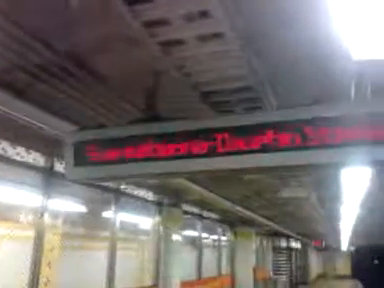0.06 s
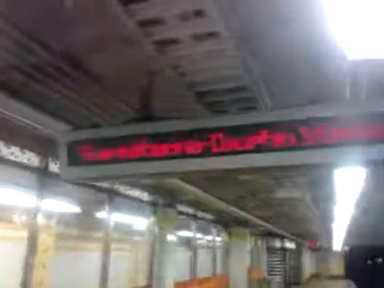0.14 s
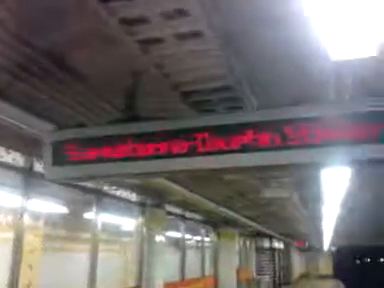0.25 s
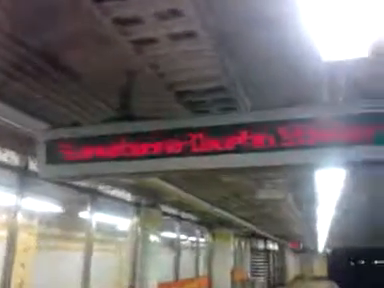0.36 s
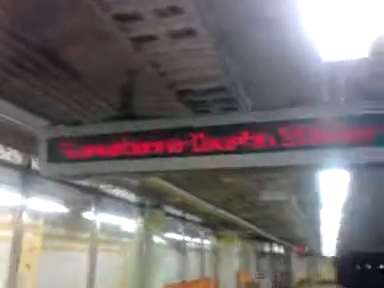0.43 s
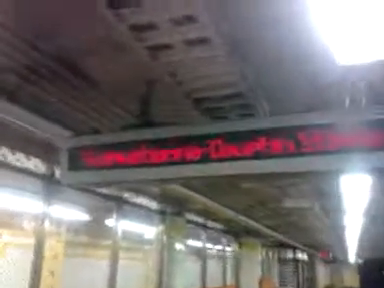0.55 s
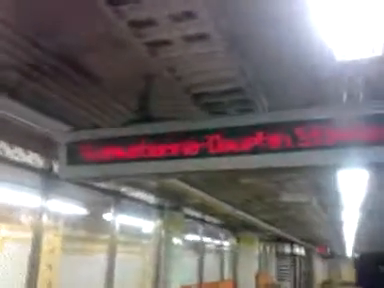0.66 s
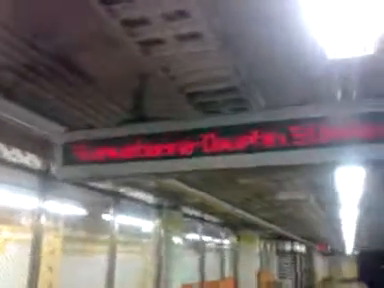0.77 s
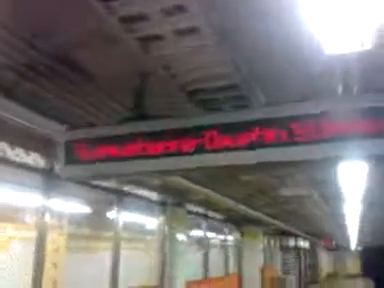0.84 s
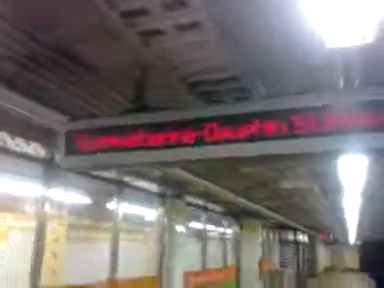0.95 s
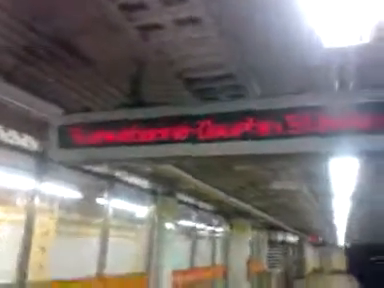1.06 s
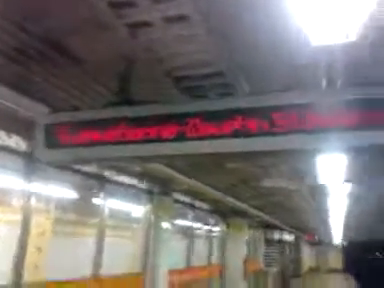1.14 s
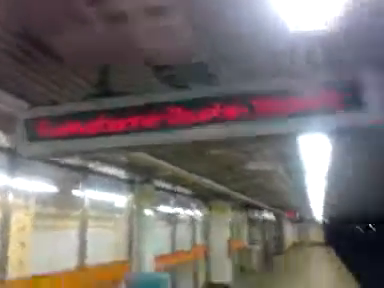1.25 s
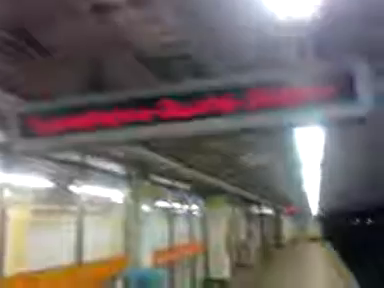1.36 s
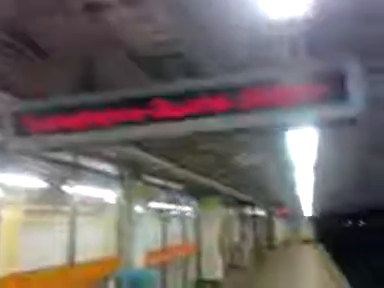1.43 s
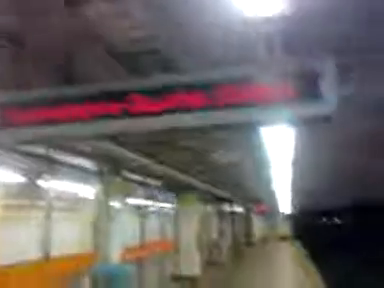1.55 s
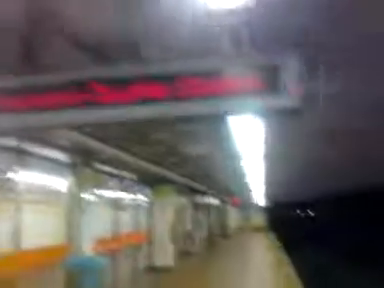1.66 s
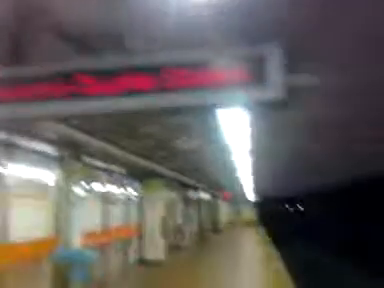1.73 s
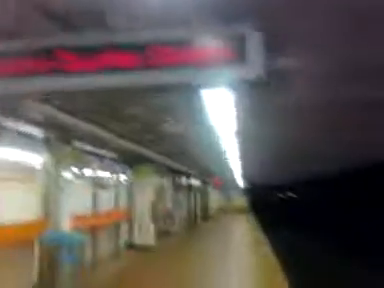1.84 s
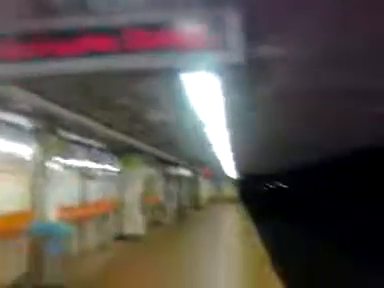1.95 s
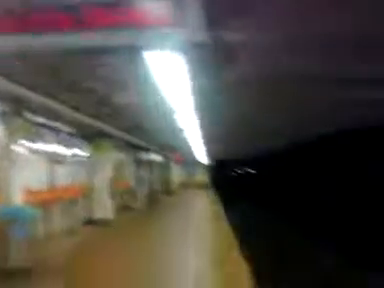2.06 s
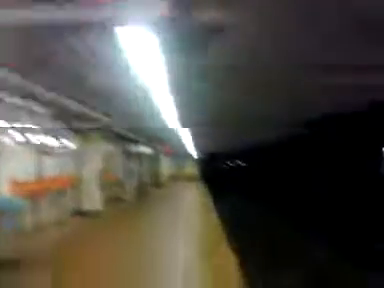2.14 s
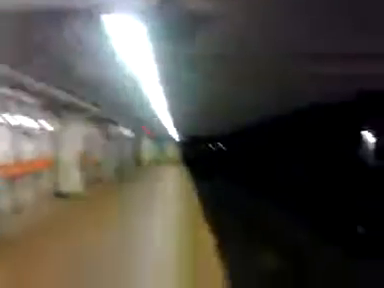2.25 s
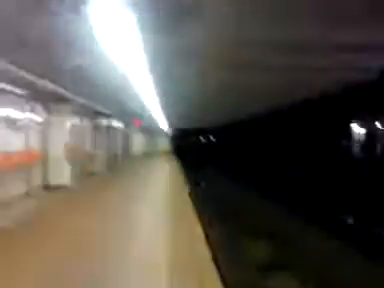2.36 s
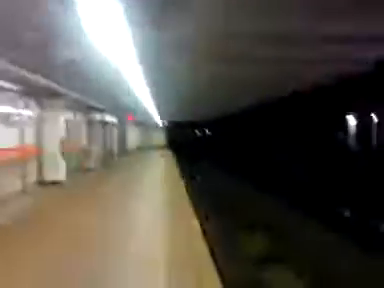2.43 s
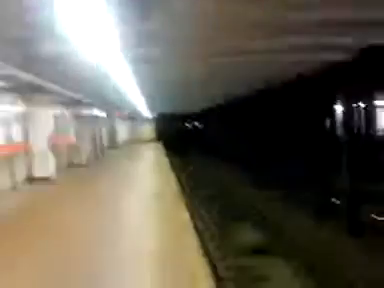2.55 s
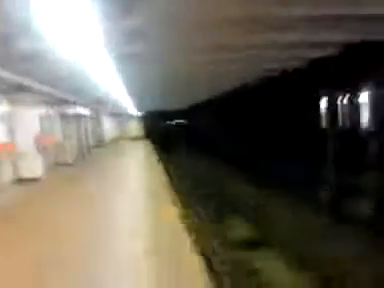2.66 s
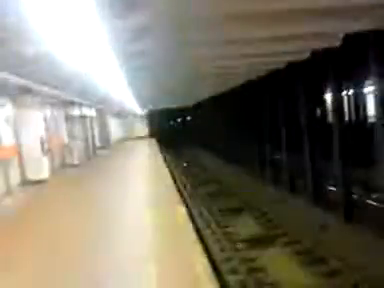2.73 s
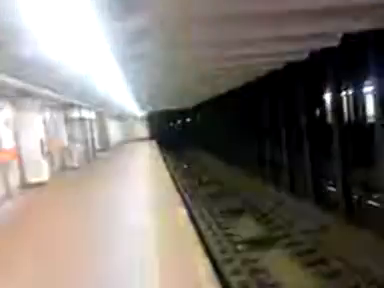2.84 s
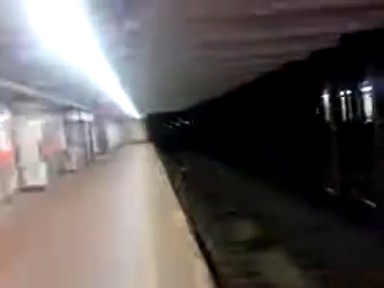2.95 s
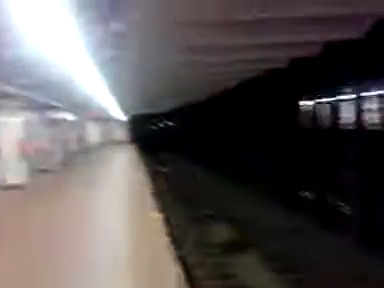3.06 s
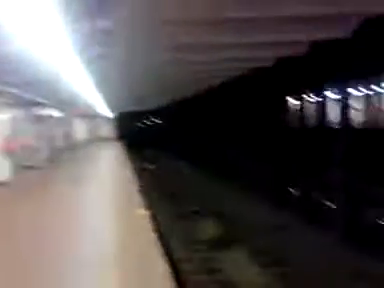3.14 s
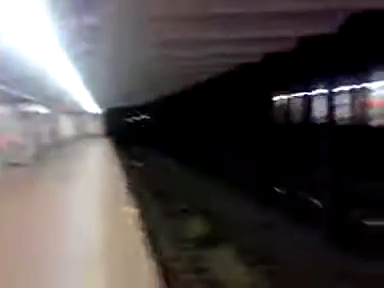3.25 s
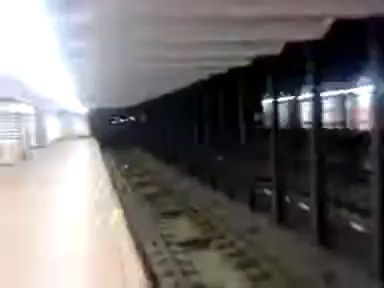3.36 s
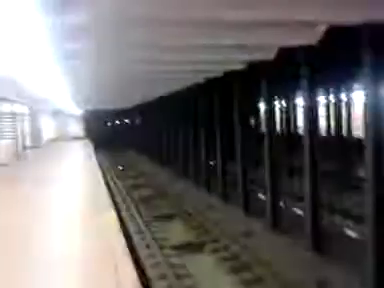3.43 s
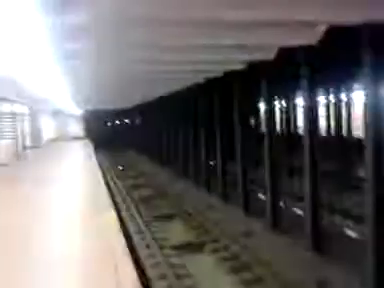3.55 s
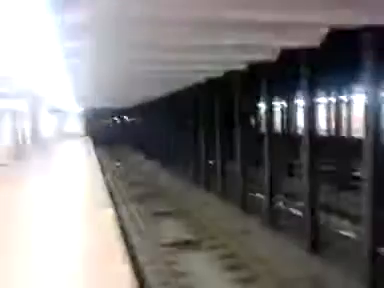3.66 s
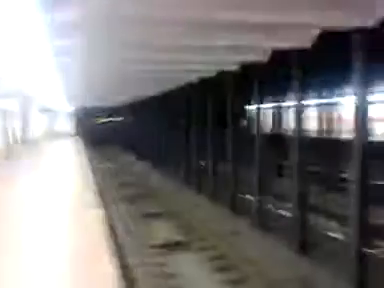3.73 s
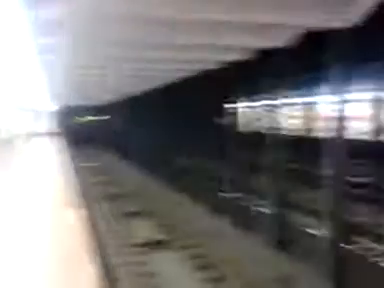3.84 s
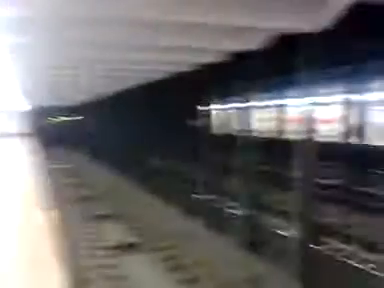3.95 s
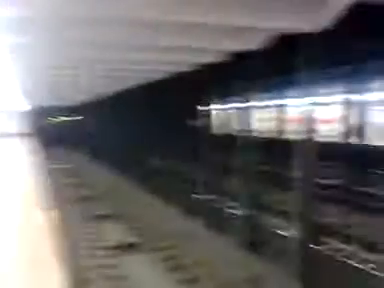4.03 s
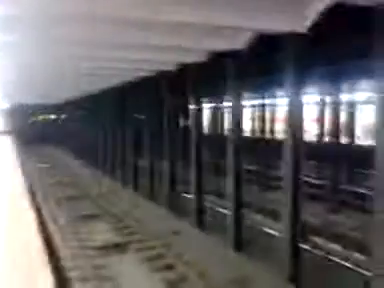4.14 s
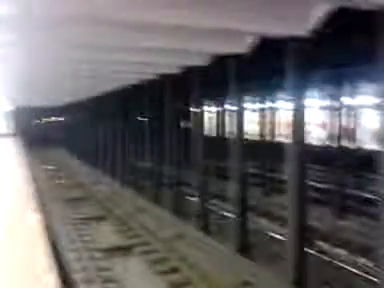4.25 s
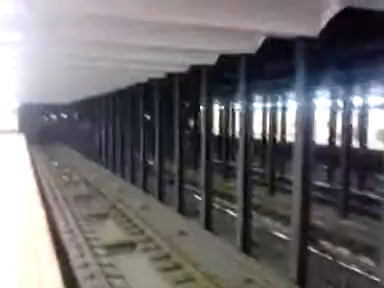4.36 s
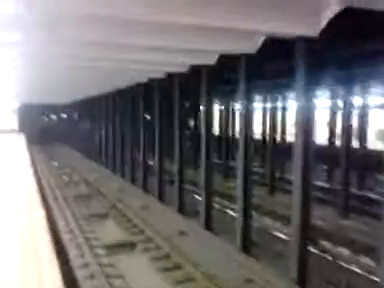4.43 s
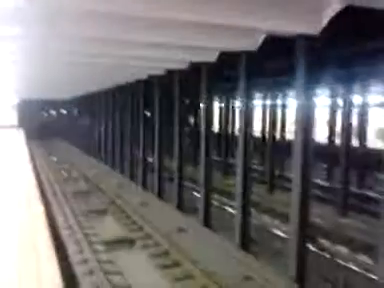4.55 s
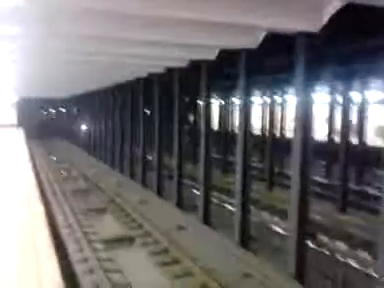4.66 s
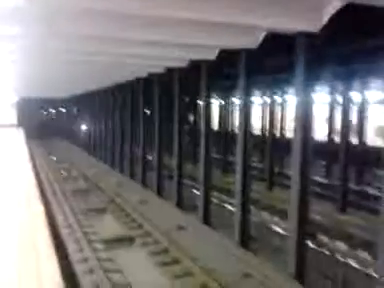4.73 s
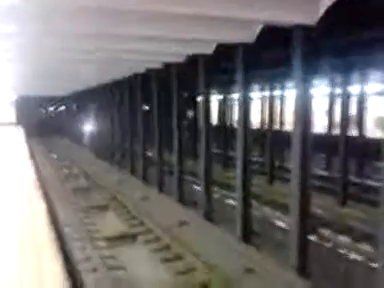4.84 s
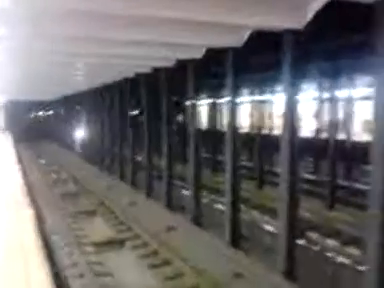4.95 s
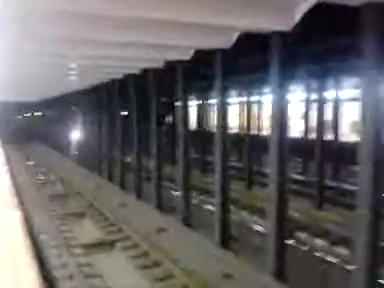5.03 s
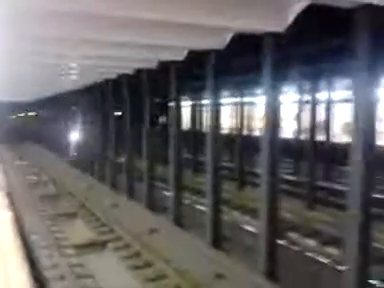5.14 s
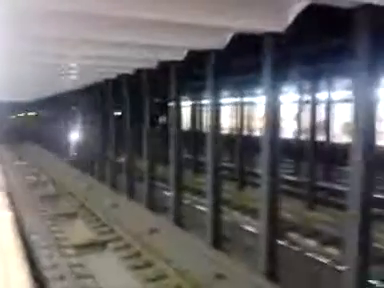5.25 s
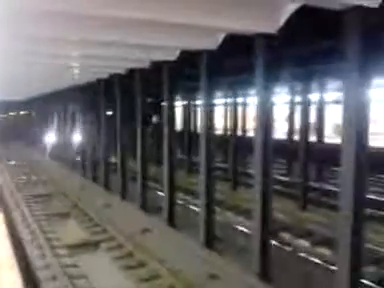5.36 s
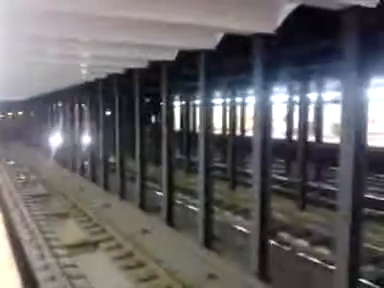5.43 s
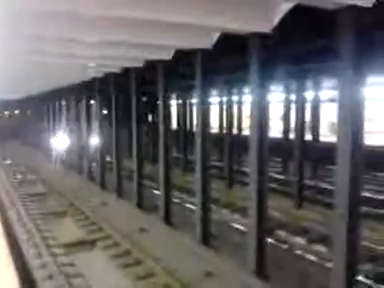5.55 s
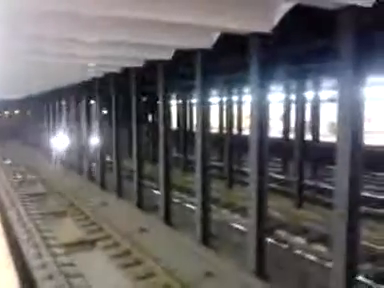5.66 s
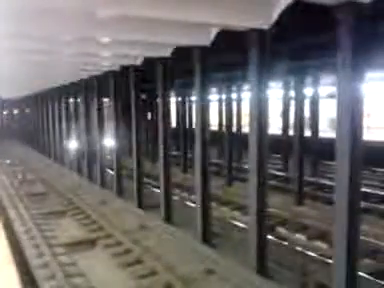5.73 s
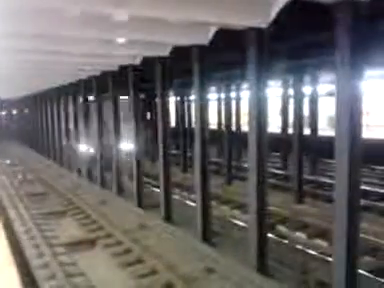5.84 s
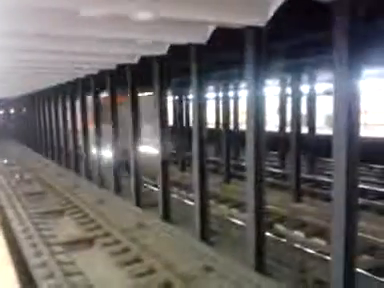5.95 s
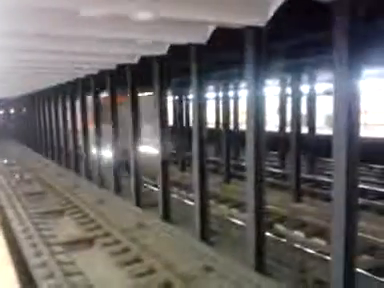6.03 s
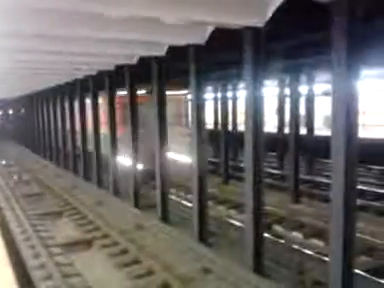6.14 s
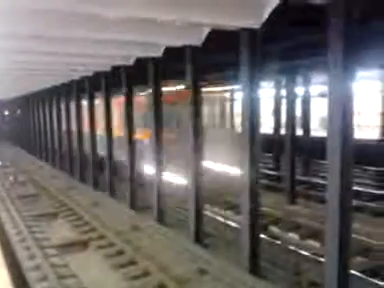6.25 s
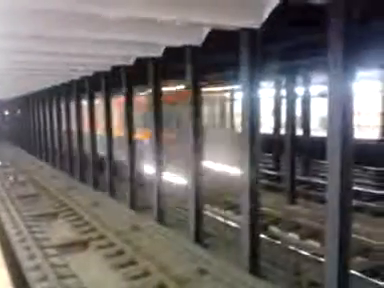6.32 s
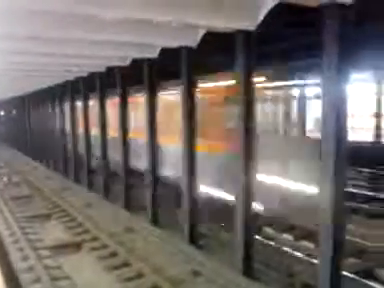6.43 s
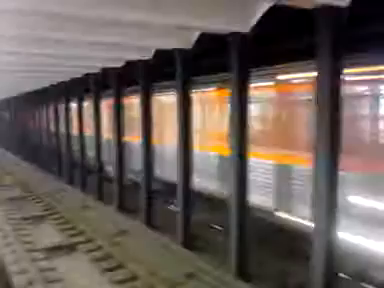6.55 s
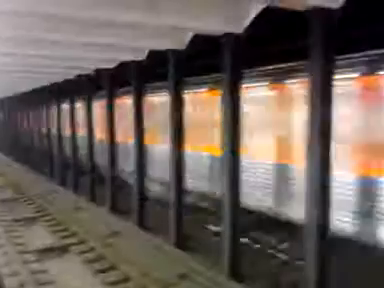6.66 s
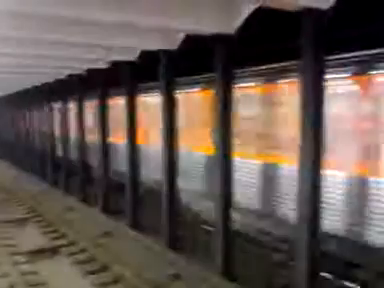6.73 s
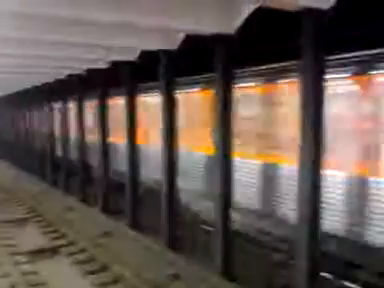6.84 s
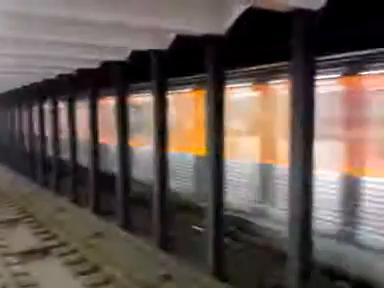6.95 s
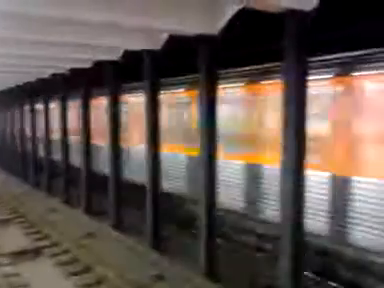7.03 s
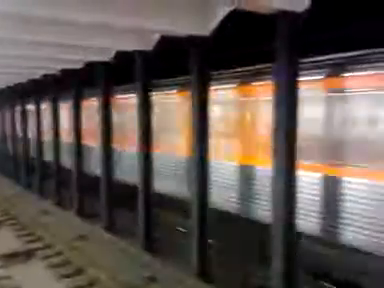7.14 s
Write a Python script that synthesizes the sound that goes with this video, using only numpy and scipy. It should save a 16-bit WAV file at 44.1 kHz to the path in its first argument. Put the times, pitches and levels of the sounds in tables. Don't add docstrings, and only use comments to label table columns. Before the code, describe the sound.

A subway train approaches from a tunnel, low rumble swelling steadily into a harsh, overloaded wheel roar as it rushes past the platform.

```python
import sys
import numpy as np
from scipy import signal
from scipy.fft import rfft, irfft, next_fast_len
from scipy.io import wavfile
from scipy.ndimage import uniform_filter1d

SR = 44100
rng = np.random.default_rng(int(sys.argv[2]) if len(sys.argv) > 2 else 0)


def voltage_ratio(level):
    return 10 ** (np.asarray(level, float) / 20)


def unload_wav(signal):
    wavfile.write(
        sys.argv[1],
        SR,
        np.round(np.clip(np.atleast_2d(signal).T, -1, 1) * 32767).astype(np.int16),
    )


N = 317079
T = np.arange(N) / SR


def evened(x):
    return x / np.sqrt(np.mean(x ** 2) + 1e-20)


def colour(x, spectrum):
    size = next_fast_len(N)
    freq_hz, level_db = np.transpose(spectrum)
    hz = np.fft.rfftfreq(size, 1 / SR)
    gain = voltage_ratio(np.interp(np.log(hz + 1), np.log(freq_hz + 1), level_db))
    return irfft(rfft(x, size) * gain, size)[:N]


def bump(centre_s, length_s):
    return np.cos(np.pi * np.clip((T - centre_s) / (2 * length_s), -.5, .5)) ** 2


def grains(slot):
    starts = np.arange(0, N - slot, slot)
    spread_db = 2.5
    height = voltage_ratio(spread_db * np.minimum(rng.exponential(1, len(starts)), 4))
    sign = rng.choice([-1., 1.], len(starts))
    out = np.zeros(N)
    out[starts + rng.integers(0, slot, len(starts))] = height * sign
    return out


# freq_hz, level_db (per Hz)
TUNNEL_SPECTRUM = [(20, -42), (40, -26.5), (80, -9), (150, -5.5), (205, -0.5), (245, -3), (280, -3.5),
                   (330, -16), (450, -28.5), (900, -59.5)]


def tunnel_rumble(roar_db):
    start_db, share = -33.5, 0.46
    level_db = start_db + share * (roar_db - roar_db[0])
    return voltage_ratio(level_db) * evened(colour(grains(slot=22), TUNNEL_SPECTRUM))


# freq_hz, level_db
DRONE_SPECTRUM = [(400, -32.5), (600, -2.5), (700, -1), (790, -3.5), (1000, -24.5), (2000, -65.5)]


def rail_drone(roar_db):
    full_db, extra_rise = -4, 0.52
    return voltage_ratio(full_db + extra_rise * roar_db) * evened(colour(grains(slot=22), DRONE_SPECTRUM))


# freq_hz, level_db
BODY_SPECTRUM = [(100, -34), (200, -11), (330, -1.5), (400, -0.5), (520, -0.5), (620, -10), (900, -34),
                 (2000, -61)]


def car_boom():
    top_s, hold_s, top_db = 3.4, 1.6, -2.5
    rise_db_per_s, fall_db_per_s = 5.2, 2
    rise_db = rise_db_per_s * np.maximum(top_s - T, 0)
    fall_db = fall_db_per_s * np.maximum(T - top_s - hold_s, 0)
    return voltage_ratio(top_db - rise_db - fall_db) * evened(colour(grains(slot=22), BODY_SPECTRUM))


# start_s, length_s, pitch_hz, level_db
WHEEL_RINGS = [
    (6.882, .016, 1550, .5),
    (3.71, .025, 2400, -30),
    (.03, .03, 3300, -46),
]


def wheel_rings():
    edge_share, squeeze = .15, .5
    tones, envelopes = np.zeros(N), np.zeros(N)
    for start_s, length_s, pitch_hz, level_db in WHEEL_RINGS:
        to_edge_s = np.minimum(T - start_s, start_s + length_s - T)
        envelope = voltage_ratio(level_db) * np.clip(to_edge_s / (edge_share * length_s), 0, 1)
        tones += envelope * np.sin(2 * np.pi * pitch_hz * (T - start_s))
        envelopes += envelope
    return tones, 1 / (1 + squeeze * envelopes)


# start_s, peak_db (over the ceiling)
THUMP_PEAKS = [(3.8577, 1.2), (3.8836, .5), (3.944, 1), (3.9635, 1.2), (4.0562, .5), (4.0605, .8),
               (4.1949, 1), (4.2518, 1.2), (4.2560, .8), (4.2807, .4), (4.2967, 1.2), (4.3216, .8),
               (4.3396, .6), (4.3546, 1.2), (4.3856, .8), (4.3915, 1), (4.4119, .8), (4.4355, 1.5),
               (4.4588, 1)]


def thumps():
    rise_s, pitch_hz, gain_db = .0015, 690, -3
    pushes, shapes = np.zeros(N), np.zeros(N)
    for start_s, peak_db in THUMP_PEAKS:
        peak_s = start_s + rise_s
        shape = bump(peak_s, rise_s)
        pushes += shape * voltage_ratio(peak_db + gain_db) * np.cos(2 * np.pi * pitch_hz * (T - peak_s))
        shapes += shape
    return pushes, 1 - shapes


def wheel_brightness():
    mouth_s, abreast_s = 2.77, 6.57
    start_db, tunnel_db_per_s, open_db_per_s, passed_db_per_s = -0.07, -2.07, 3, -9
    tunnel_db = tunnel_db_per_s * np.minimum(T, mouth_s)
    open_db = open_db_per_s * (np.clip(T, mouth_s, abreast_s) - mouth_s)
    passed_db = passed_db_per_s * np.maximum(T - abreast_s, 0)
    return start_db + tunnel_db + open_db + passed_db


# centre_s, length_s, roar_db, brightness_db
RAIL_JOINTS = [(0.715, 0.0059, 9, -7), (1.872, 0.0055, 5, -7), (3.231, 0.008, 5.5, 1),
               (4.758, 0.01, 2.5, 2.5), (5.297, 0.018, 2.5, -5.5), (5.338, 0.023, 5, 4),
               (5.581, 0.025, 1, 4.5), (5.747, 0.022, 1, 4), (5.943, 0.017, 4, 1), (6.225, 0.019, 7, 4),
               (6.371, 0.016, 7, 7), (6.604, 0.022, 4.5, -1.5), (6.743, 0.028, 0, 6.5),
               (6.782, 0.0097, 8.5, -2), (6.835, 0.013, 0.5, 5.5), (6.954, 0.077, 6, 5),
               (7.07, 0.036, 4, 5.5), (7.122, 0.04, 2, 6.5)]


def rail_joints(roar_db, bright_db):
    for centre_s, length_s, swell_db, edge_db in RAIL_JOINTS:
        swell = bump(centre_s, length_s)
        roar_db = roar_db + swell_db * swell
        bright_db = bright_db + edge_db * swell
    return roar_db, bright_db


# freq_hz, level_db (per Hz)
ROLLING_SPECTRUM = [(30, -58.5), (150, -30), (330, -10), (560, -5), (760, -2), (1000, -6.5), (1180, -11),
                    (1400, -12.5), (1620, -12.5), (2050, -20.5), (2450, -19.5), (2900, -23.5), (3200, -21),
                    (4000, -42)]


def rolling_roar():
    return evened(colour(grains(slot=30), ROLLING_SPECTRUM))


def levelled(x, share):
    power = uniform_filter1d(x ** 2, size=220)
    return evened(x / (power + 0.055) ** (share / 2))


def patchy(x, bright_db, patch_db, flicker_db):
    flicker_hz, wheel_hz = 1020, 1680
    hz, t, z = signal.stft(x, SR, nperseg=256, noverlap=192)
    field = rng.standard_normal((len(t), len(hz))).T
    field = uniform_filter1d(field, size=2, axis=0)
    patches = evened(uniform_filter1d(field, size=14, axis=1))
    flicker = evened(uniform_filter1d(rng.standard_normal(len(t)), size=3))
    upper = 1 / (1 + (flicker_hz / (hz[:, None] + 1)) ** 4)
    top = 1 / (1 + (wheel_hz / (hz[:, None] + 1)) ** 6)
    gain_db = patch_db * patches + upper * flicker_db * flicker + top * np.interp(t, T, bright_db)
    return signal.istft(z * voltage_ratio(gain_db), SR, nperseg=256, noverlap=192)[1][:N]


# time_s, roar_db (rms)
APPROACH = [(0.0, -32), (0.6, -29), (1.3, -25.5), (2.0, -22), (2.7, -19.5), (3.3, -17), (3.9, -14),
            (4.4, -11), (4.9, -10.5), (5.35, -7.5), (5.65, -5), (6.0, -4), (6.4, -2), (6.75, -2.5),
            (7.0, -2), (7.19, -1.5)]


def train():
    approach_db = np.interp(T, *np.transpose(APPROACH))
    tunnel = tunnel_rumble(approach_db)
    drone = rail_drone(approach_db)
    roar_db, bright_db = rail_joints(approach_db, wheel_brightness())
    rolling = levelled(rolling_roar() + car_boom() + drone, share=0.23)
    return tunnel + patchy(voltage_ratio(roar_db) * rolling, bright_db, patch_db=1.9, flicker_db=1.0)


def limited(x):
    mic_limit, hold_limit, knee = 1.5, .62, 6
    hold_until_s, give_way_s = 4.25, 1.1
    rounded = mic_limit * np.tanh(x / mic_limit)
    give_way = np.clip((T - hold_until_s) / give_way_s, 0, 1) ** 2
    limit = hold_limit + (2 * mic_limit - hold_limit) * give_way
    return rounded / (1 + abs(rounded / limit) ** knee) ** (1 / knee)


def scene():
    pushes, hollow = thumps()
    tones, squeeze = wheel_rings()
    return (hollow * squeeze * limited(train()) + pushes + tones)[None]


# start_s, length_s, depth_db
LEVEL_LAPSES = [(4.524, .006, 7), (4.594, .005, 5), (5.255, .01, 2.5), (5.797, .012, 4), (6.19, .014, 13),
                (6.7235, .0155, 17), (6.7545, .0095, 18), (6.7675, .006, 11), (6.805, .004, 2),
                (6.8335, .0055, 14), (6.842, .0075, 13), (6.891, .013, 14), (6.9155, .014, 24),
                (7.0855, .013, 15), (7.1495, .009, 7), (7.175, .012, 15)]


def level_lapses(x):
    loss_db = np.zeros(N)
    for start_s, length_s, depth_db in LEVEL_LAPSES:
        progress = (T - start_s) / length_s
        loss_db += depth_db * (1 - 0.49 * progress) * ((progress > 0) & (progress < 1))
    return x * voltage_ratio(-uniform_filter1d(loss_db, size=60))


def top_cut(x):
    return signal.sosfilt(signal.butter(12, 15750, fs=SR, output="sos"), x)


# freq_hz, level_db
PHONE_BAND = [(15, -8.5), (50, -1), (3900, 1.5), (4200, -6.5), (4450, -17.5), (4700, -54.5), (4850, -120)]


def record(dry):
    ceiling, low_cut_hz = .705, 14
    narrow = colour(level_lapses(dry[0]), PHONE_BAND)
    clipped = np.clip(narrow, -ceiling, ceiling)
    low_cut = signal.butter(1, low_cut_hz, "high", fs=SR)
    mix = signal.lfilter(*low_cut, clipped)[None]
    return top_cut(mix)


dry = scene()
out = record(dry)
unload_wav(out)
```